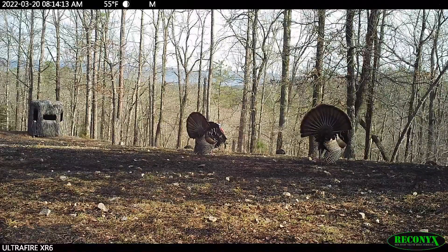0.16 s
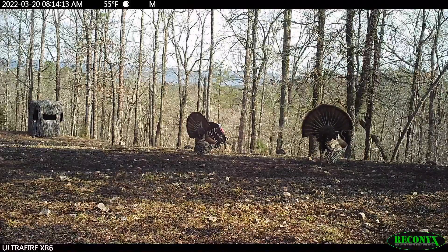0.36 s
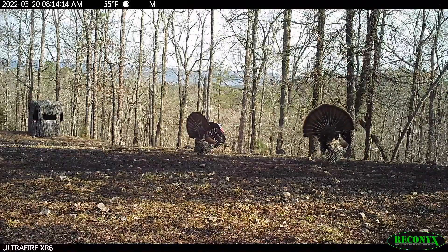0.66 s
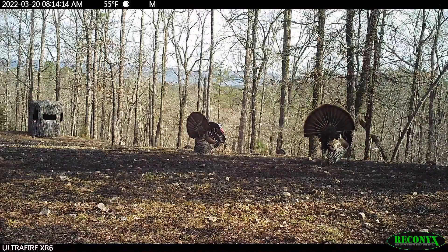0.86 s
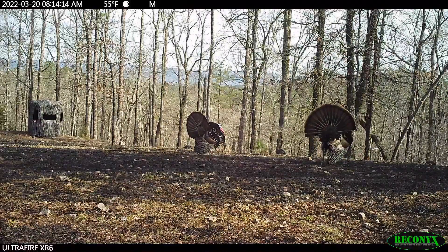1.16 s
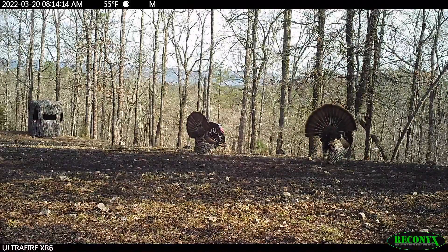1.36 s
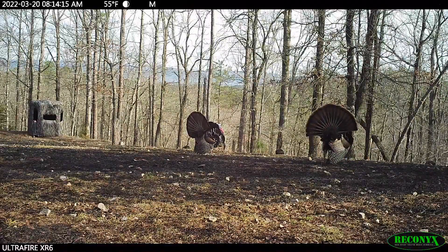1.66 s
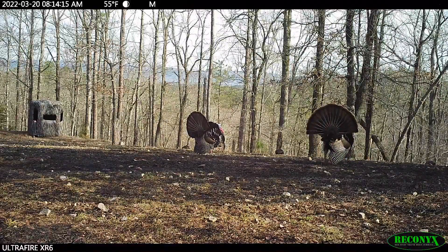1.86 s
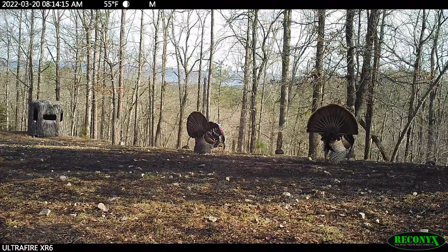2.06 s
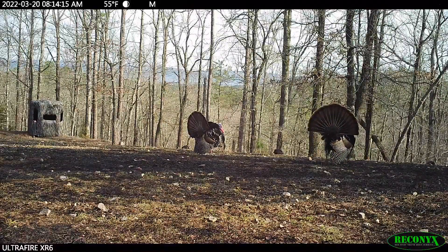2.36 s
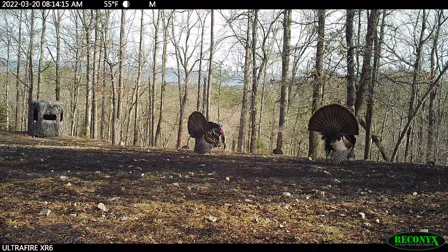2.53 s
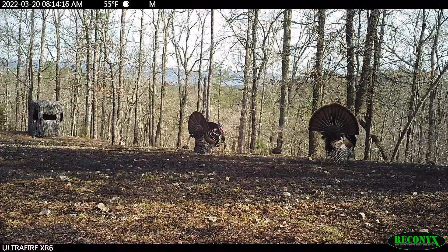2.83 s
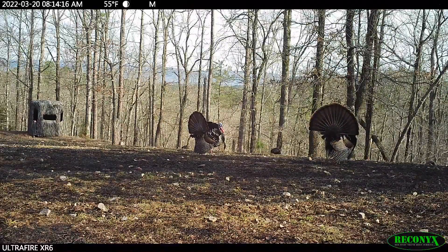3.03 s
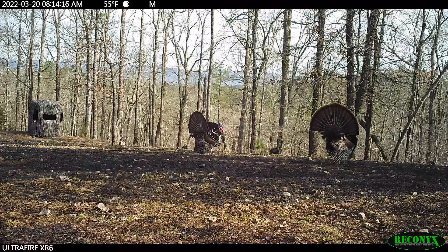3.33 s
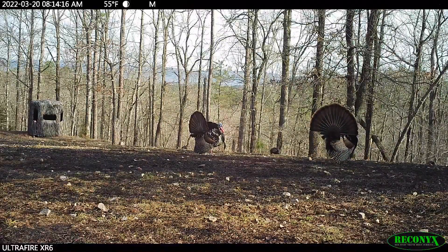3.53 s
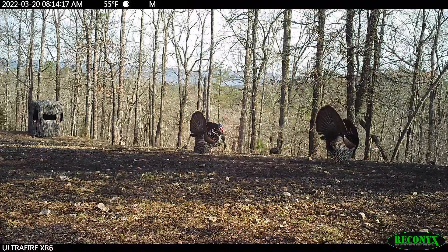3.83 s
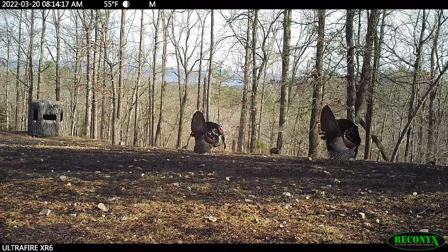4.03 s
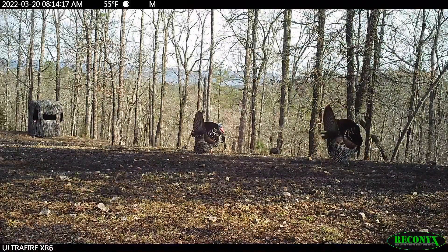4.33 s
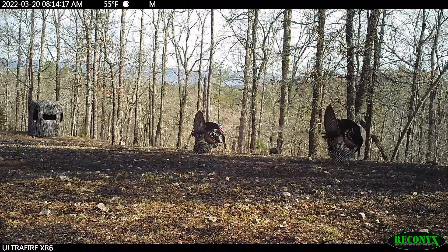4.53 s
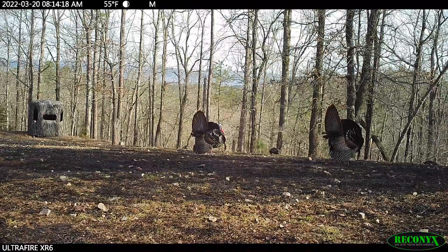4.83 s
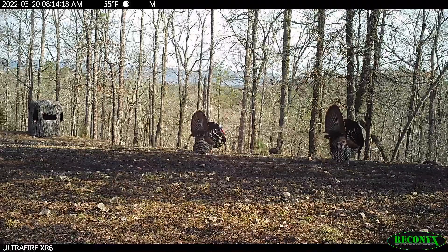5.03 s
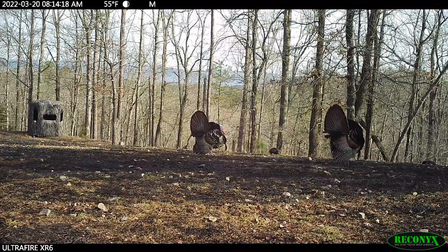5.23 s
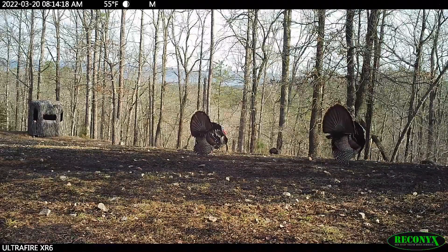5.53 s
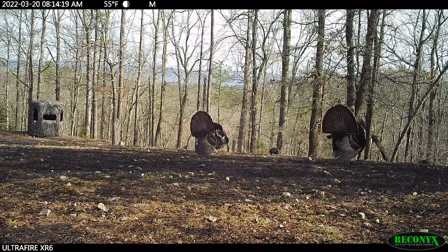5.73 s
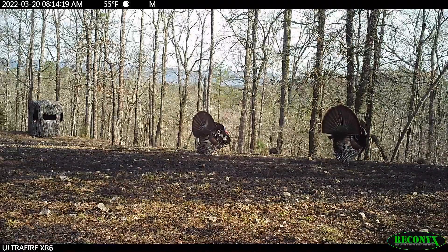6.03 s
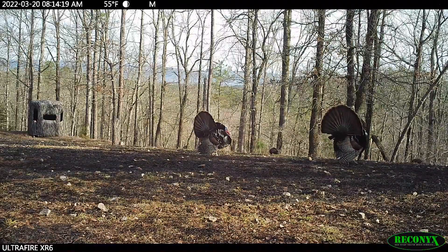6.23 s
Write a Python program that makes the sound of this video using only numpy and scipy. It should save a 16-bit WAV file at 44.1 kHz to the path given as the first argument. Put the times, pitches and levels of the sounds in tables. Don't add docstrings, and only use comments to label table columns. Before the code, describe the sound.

Large birds' wing tips and feet scuff crisp leaf litter, ticking and snapping, while faint birds chirp far off behind constant soft hiss.

```python
import sys
import numpy as np
from scipy import signal
from scipy.fft import rfft, irfft
from scipy.io import wavfile
from scipy.ndimage import uniform_filter1d

SR = 44100
rng = np.random.default_rng(int(sys.argv[2]) if len(sys.argv) > 2 else 0)


def decibels_to_gain(level_db):
    exponent = np.asarray(level_db, float) / 20
    return 10 ** exponent


def log_audio(samples):
    frames = np.atleast_2d(samples).T
    limited = np.clip(frames, -1, 1)
    pcm = np.round(limited * 32767).astype(np.int16)
    wavfile.write(sys.argv[1], SR, pcm)


N = 281358

TICK_HZ, TICK_MS = 6980, 0.38


def ring(x, hz, width_hz, db):
    return decibels_to_gain(db) * signal.lfilter(*signal.iirpeak(hz, hz / width_hz, SR), x)


def unit(x):
    return x / np.std(x)


def coloured(points, shared):
    hz, db = np.transpose(points)
    both, left, right = rng.standard_normal((3, N))
    pair = np.sqrt(shared) * both + np.sqrt(1 - shared) * np.array([left, right])
    log_hz = np.log(np.fft.rfftfreq(N, 1 / SR) + 0.1)
    gain = decibels_to_gain(np.interp(log_hz, np.log(hz), db))
    return unit(irfft(rfft(pair) * gain, N))


def wander(rate_hz):
    k = int(SR / rate_hz)
    return unit(uniform_filter1d(uniform_filter1d(rng.standard_normal((2, N)), k), k))


def grains(rate_hz, scatter_db):
    when, sign, luck = rng.random((3, N))
    size = decibels_to_gain(np.minimum(-scatter_db * np.log(1 - luck), 11))
    return unit((when < rate_hz / SR) * np.sign(sign - 0.5) * size)


def cracks(s, peak, hz, ms, treble):
    t = np.arange(96) / SR
    s, peak, hz, tau, treble = (np.asarray(v)[:, None] for v in (s, peak, hz, ms / 1000, treble))
    phase, spit = rng.random((2, len(s), 1))
    envelope = (1 - np.exp(-t / 0.00008)) * np.exp(-t / (0.8 * tau))
    body = envelope * np.sin(2 * np.pi * (hz * t + phase))
    spit_hz = 10500 * (0.82 + 0.36 * spit)
    top = np.exp(-t / 0.00011) * np.sin(2 * np.pi * (spit_hz * t + phase))
    out = np.zeros(N + 96)
    np.add.at(out, (s * SR).astype(int) + np.arange(96), peak * (body + treble * top))
    return signal.sosfilt(signal.butter(2, 3800, "high", fs=SR, output="sos"), out[:N])


def note(s, db, hz, length_s, bend):
    u = np.clip((np.arange(N) / SR - s) / length_s, 0, 1)
    swell = np.sqrt(2 * np.abs(np.sin(np.pi * u)))
    return decibels_to_gain(db) * swell * np.sin(2 * np.pi * np.cumsum(hz * bend(u)) / SR)


def preamp():
    # freq_hz, density_db
    hiss_points = [(90, -47), (150, -10), (300, -6), (600, -5.5), (1400, -8.5), (3900, -13), (7000, -15),
                   (9000, -15), (16000, -17.5)]
    flutter_points = [(2, -1), (6, -4.5), (14, 0.5), (30, -6), (55, -7.5), (120, -16.5), (300, -27),
                      (900, -42)]
    # left_db, right_db
    flutter_db = (-53.5, -55)
    # pitch_hz, level_db
    whine_tones = [(9800, -93), (9860, -94)]
    # end_level, start_step, time_constant_s
    offsets = [(-.0365, 0.024, 1.4), (-.032, 0.025, 1.56)]
    t = np.arange(N) / SR
    hiss = decibels_to_gain(-60.74 + 0.95 * wander(6.5)) * coloured(hiss_points, shared=0.45)
    swell_db = np.array(flutter_db)[:, None] + 1.66 * wander(4.6)
    flutter = decibels_to_gain(swell_db) * coloured(flutter_points, shared=0.45)
    whine = sum(np.sqrt(2) * decibels_to_gain(db) * np.sin(2 * np.pi * hz * t) for hz, db in whine_tones)
    offset = np.array([end + step * np.exp(-t / tau) for end, step, tau in offsets])
    return hiss + flutter + whine + offset


def breeze():
    puff_hz, width_hz, level_db, lump_db = 143, 186, -73, 5.0
    both, left, right = rng.standard_normal((3, N))
    lumps = decibels_to_gain(level_db + lump_db * wander(9.6)[0])
    puffs = ring(both + np.array([left, right]), puff_hz, width_hz, 0)
    return lumps * unit(ring(puffs, puff_hz, 2 * width_hz, 0))


def far_birds():
    # start_s, level_db, length_s
    chip_notes = [(0.177, -71, 0.025), (0.267, -73, .03), (0.41, -70, .035), (0.559, -72, 0.053),
                  (0.721, -71, .03), (0.865, -71, .05), (1.03, -70, .03), (1.18, -71, .025),
                  (4.698, -72, .03), (4.786, -69, .03), (4.932, -69, .035), (5.08, -69, .03),
                  (5.235, -68.5, .045)]
    # start_s, level_db
    grace_notes = [
        (.34, -77),
        (.938, -74),
        (4.995, -70),
        (5.3, -73),
    ]
    # start_s, level_db, top_hz, length_s
    yelp_notes = [
        (0.28, -70, 1424, 0.061),
        (0.566, -67, 1430, 0.067),
        (4.772, -70, 1484, 0.037),
    ]
    # delay_s, level_db
    echoes = [(.013, -15), (.03, -15)]
    droop_hz_per_s = 4600
    chips = [(s, db, 2835, length) for s, db, length in chip_notes]
    chips += [(s, db, 2740, 0.028) for s, db in grace_notes]
    calls = np.zeros(N)
    for s, db, hz, length in chips:
        calls += note(s, db, hz, length, lambda u: 1 - droop_hz_per_s * length / hz * u ** 2.2)
    for s, db, hz, length in yelp_notes:
        calls += note(s, db, hz, length, lambda u: 1 - 0.3 * (u - 0.35) ** 2)
    return calls + sum(decibels_to_gain(db) * np.roll(calls, int(s * SR)) for s, db in echoes)


def thuds():
    # start_s, peak_db, pitch_hz, ring_ms
    landings = [(1.546, -45.5, 1500, 4), (1.552, -53.5, 800, 5.5), (2.765, -54.5, 600, 12),
                (2.768, -58, 338, 11), (2.903, -60, 1400, 4.5), (4.011, -53, 1290, 5.8),
                (4.025, -48.5, 1530, 4), (4.114, -49, 3300, 1), (4.26, -51, 2200, 1.5),
                (5.759, -46, 3200, 1.2), (6.289, -55, 1500, 2.6), (6.297, -50, 3400, 1.5),
                (2.521, -45, 3300, 1.5)]
    out, t = np.zeros(N + 1500), np.arange(1500) / SR
    for s, db, hz, ms in landings:
        grit = rng.standard_normal(1500) * np.exp(-t * 1000 / ms)
        grit[0] = 7.5
        knock = ring(ring(grit, hz, 0.45 * hz, 0), hz, 1.3 * hz, 0)
        start = int(s * SR)
        out[start:start + 1500] += decibels_to_gain(db + 3) * knock / np.abs(knock).max()
    return out[:N]


def snaps():
    # start_s, peak_db, pitch_hz,
    # ring_ms, treble_db
    twigs = [(2.5202, -35, 5900, 0.6, -8), (2.5212, -38, 7300, 0.6, -12), (2.5225, -37, 6300, 0.7, -14),
             (2.9732, -20.5, 8100, 0.18, -13), (3.0517, -32.5, 6020, 0.37, -10),
             (3.3366, -40, 6960, 0.54, -18), (3.522, -41, 7800, 0.2, -7), (4.2559, -24.5, 7700, 0.49, -20),
             (4.2566, -28.5, 7240, 0.48, -7), (4.2597, -41, 6700, .9, -20), (4.7927, -34.5, 6070, 0.49, -9),
             (4.7944, -28, 7700, 0.35, -7), (4.7956, -41, 7400, 0.34, 4.5), (4.9178, -33, 7700, 0.34, -11),
             (4.9357, -33.5, 7550, 0.41, -16), (5.7554, -23, 7450, 0.39, -14),
             (6.2896, -25, 7550, 0.3, -15), (6.2962, -39, 6800, 0.37, -6), (6.2976, -38, 7000, 0.53, -14)]
    # start_s, peak_db
    leaf_ticks = [(1.232, -41), (1.335, -39), (1.4568, -42), (1.5473, -36), (1.5502, -33.5), (1.8085, -41),
                  (1.813, -38), (1.899, -42), (1.9287, -35), (1.9576, -34), (2.0377, -46), (2.1364, -49),
                  (2.144, -48), (2.298, -36.5), (2.3007, -37.5), (2.407, -44), (2.5387, -36),
                  (2.543, -30.5), (2.5954, -37), (2.7113, -39), (2.7248, -40), (2.756, -40), (2.7757, -40),
                  (2.796, -39), (2.9383, -40), (3.0119, -39), (3.03, -38), (3.083, -36), (3.472, -47),
                  (3.505, -40),
                  (0.096, -38.5), (0.391, -44.5), (0.652, -44), (0.8724, -37.5), (0.877, -42),
                  (0.9784, -43), (1.0846, -44), (4.1234, -40.5), (4.2459, -42), (4.5268, -46),
                  (4.677, -40.5), (4.8307, -41), (4.842, -39), (4.9232, -38), (4.9287, -37), (4.9724, -47),
                  (5.0275, -41.5), (5.2118, -43.5), (5.264, -40), (5.455, -40), (5.4631, -44),
                  (5.5023, -44), (5.5986, -42), (5.642, -36), (5.736, -41), (5.7611, -34.5), (5.9092, -45),
                  (6.0872, -34), (6.2325, -37.5), (6.3703, -36)]
    ticks = np.array(leaf_ticks)
    odd = rng.standard_normal((3, len(ticks)))
    tick_hz = TICK_HZ * np.exp(0.042 * odd[0])
    tick_ms = TICK_MS * np.exp(0.15 * odd[1])
    tick_treble_db = -15 + 4 * odd[2]
    tick_rows = np.column_stack([ticks, tick_hz, tick_ms, tick_treble_db])
    s, peak_db, hz, ms, treble_db = np.vstack([twigs, tick_rows]).T
    out = cracks(s, decibels_to_gain(peak_db + 4), 0.977 * hz, ms, decibels_to_gain(treble_db + 9.5))
    for late, pitch in rng.random((7, 2, len(s))):
        delay_s = 0.0006 * (1 + 10 * late ** 2)
        when_s = np.minimum(s + delay_s, N / SR - 0.01)
        after_hz = hz * (0.9 + 0.24 * pitch)
        out += cracks(when_s, decibels_to_gain(peak_db - 8.5 - 12 * late), after_hz, ms, decibels_to_gain(treble_db))
    return signal.sosfilt(signal.butter(3, 5000, "high", fs=SR, output="sos"), out)


def drag_power():
    # centre_s, level_db, length_ms
    wing_drags = [(1.242, -58, 22), (1.291, -64, 55), (1.342, -56, 41), (1.5, -60.5, 70), (1.55, -55.5, 28),
                  (1.6, -63, 60), (1.807, -61.5, 51), (1.931, -58.5, 96), (2.057, -55.5, 56),
                  (2.155, -57.5, 61), (2.198, -53.5, 22), (2.226, -63, 47), (2.332, -65, 130),
                  (2.403, -57.5, 61), (2.487, -59, 49), (2.559, -54.5, 105), (2.646, -58, 34),
                  (2.718, -55.5, 55), (2.776, -51.5, 58), (2.851, -58, 120), (2.907, -50, 24),
                  (2.939, -54, 34), (3.039, -51, 30), (3.076, -57.5, 43), (3.116, -55.5, 15),
                  (3.194, -61, 51), (3.32, -63, 70), (3.425, -65, 56), (3.495, -56, 71), (3.58, -68.5, 130)]
    # centre_s, level_db, length_ms, soil_rasp_db
    steps = [(4.02, -49, 24.6, -13), (4.08, -64.5, 130, -12), (4.181, -61.5, 36, -25), (4.26, -56, 13, -9),
             (4.293, -67, 69, -14), (4.418, -63.5, 44, -14), (4.685, -67, 90, -25), (4.798, -57.5, 14, -15),
             (4.927, -61, 23, -8), (5.259, -62.5, 31, -11), (5.617, -66, 38, -14), (5.648, -52, 18, -13.5),
             (5.735, -67, 22, -6), (5.775, -65, 22, -10), (6.045, -61, 34, -13), (6.07, -55, 16, -20),
             (6.091, -50.5, 25, -14), (6.117, -61, 20, -25), (6.195, -60, 40, -25), (6.238, -58, 30, -14),
             (6.27, -61, 23, -15), (6.297, -54, 25, -5), (6.35, -60.5, 77, -9)]
    wing_soil_db, stir_db = -14.5, -74.5
    t = np.arange(N) / SR
    leaf, soil = np.full(N, decibels_to_gain(2 * stir_db)), np.zeros(N)
    for s, db, ms, soil_db in [(*drag, wing_soil_db) for drag in wing_drags] + steps:
        near = slice(max(int((s - 0.2) * SR), 0), int((s + 0.2) * SR))
        u = (t[near] - s) / (ms / 2000)
        power = decibels_to_gain(2 * db) * np.exp(-np.abs(u) ** np.where(u < 0, 5.0, 2.5))
        leaf[near] += power
        soil[near] += power * decibels_to_gain(2 * soil_db)
    return leaf * decibels_to_gain(2 * 2.06 * wander(106)[0]), soil


def stray_pops():
    when, luck, pitch, bright = rng.random((4, 600))
    pop_db = 4.5 + np.minimum(-0.5 * np.log(1 - luck), 5)
    hz = TICK_HZ * (0.95 + 0.16 * pitch)
    ms = TICK_MS * (0.7 + 0.9 * pitch * bright)
    return cracks(when * (N - 1) / SR, decibels_to_gain(pop_db), hz, ms, decibels_to_gain(-20 + 10 * bright))


def scuffs():
    # freq_hz, width_hz, gain_db
    soil_modes = [(1500, 1700, -1), (2620, 2100, -3), (600, 260, -11)]
    leaf, soil = drag_power()
    when, luck, ring_time = rng.random((3, 12000))
    pitch, bright = rng.standard_normal((2, 12000))
    size = decibels_to_gain(np.minimum(-4.2 * np.log(1 - luck), 13))
    hz, ms = 6820 * np.exp(0.11 * pitch), 0.2 + 0.46 * ring_time
    crackle = unit(cracks(when * (N - 1) / SR, size, hz, ms, decibels_to_gain(-3.5 + 2.9 * bright)))
    slips = unit(np.bincount((when * (N - 1)).astype(int), size * np.sign(pitch), N))
    rasp = unit(sum(ring(slips + 1.44 * grains(1500, 2.6), *mode) for mode in soil_modes))
    husk = unit(ring(slips, 3070, 2200, 0))
    litter = decibels_to_gain(-1) * crackle + stray_pops() + decibels_to_gain(-11.5) * husk
    return litter * np.sqrt(leaf) + decibels_to_gain(3.5) * rasp * np.sqrt(soil)


def scene():
    air = signal.butter(2, 13300, fs=SR, output="sos")
    right = signal.sosfilt(air, snaps() + scuffs() + thuds())
    lag_s = 6.75 / 44100
    delay = np.exp(-2j * np.pi * np.fft.rfftfreq(N, 1 / SR) * lag_s)
    left = irfft(rfft(right) * delay, N)
    return np.array([left, right]) + far_birds() + preamp() + breeze()


def roll_off(x):
    return signal.sosfilt(signal.butter(12, 16330, fs=SR, output="sos"), x)


def record(dry):
    hz = np.fft.rfftfreq(N, 1 / SR)
    kept = irfft(rfft(dry) * np.interp(hz, [14900, 15230, 15300, 15900], [1, 0.75, 0.07, 0]), N)
    top = irfft(rfft(dry - kept) * (hz > 15260), N)
    treble = uniform_filter1d(ring(kept[1], 11000, 6000, 0) ** 2, size=130)
    sharp = treble > 20 * np.median(treble)
    mix = kept + 0.35 * uniform_filter1d(1.0 * sharp, size=130) * top
    return roll_off(mix)


dry = scene()
out = record(dry)
log_audio(out)
```